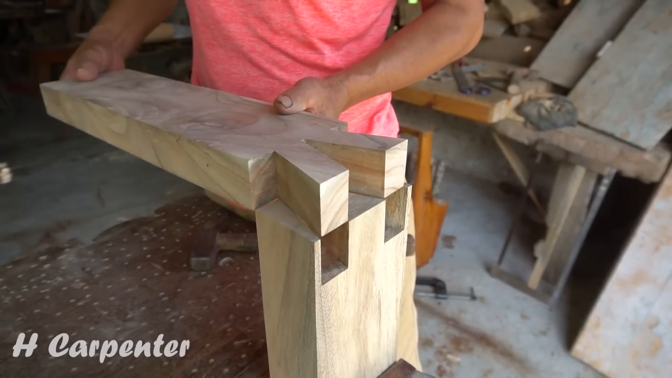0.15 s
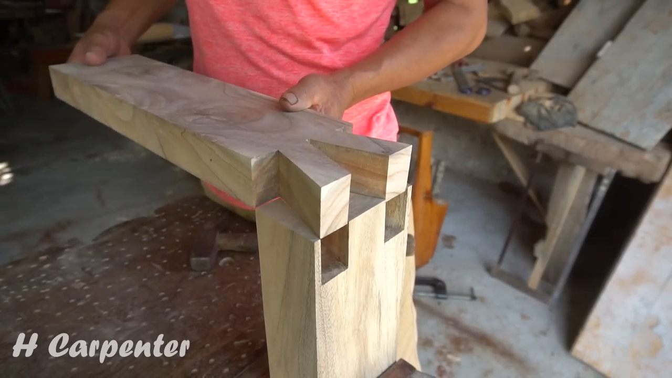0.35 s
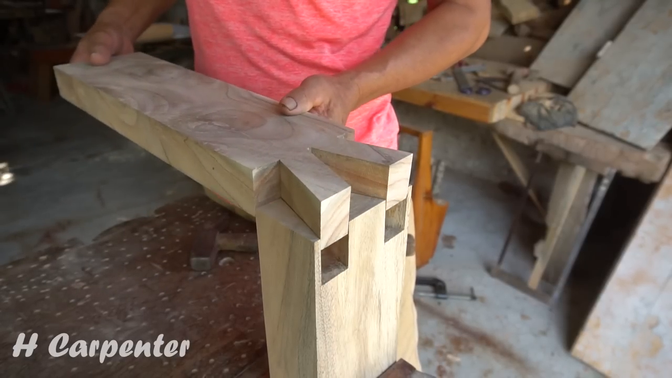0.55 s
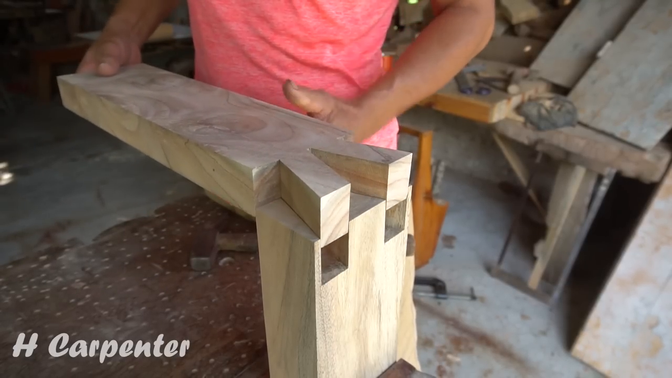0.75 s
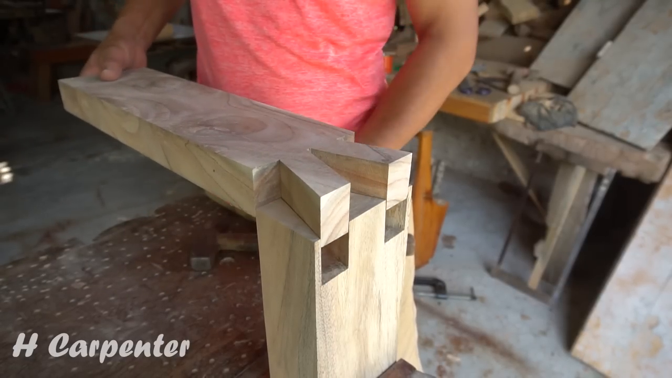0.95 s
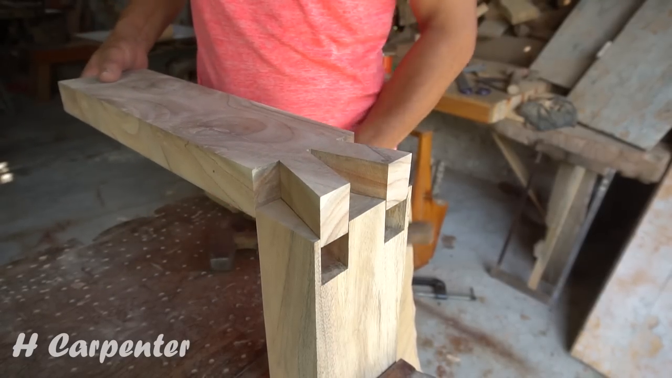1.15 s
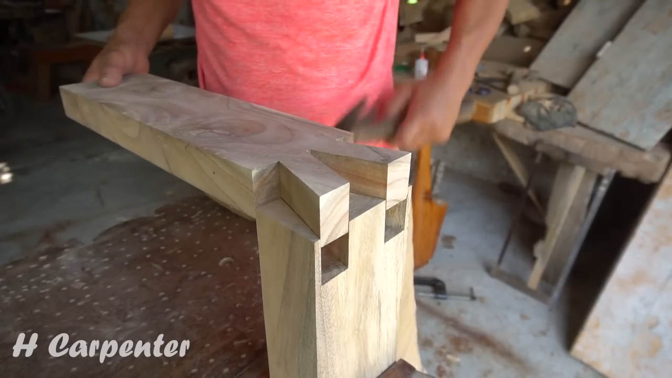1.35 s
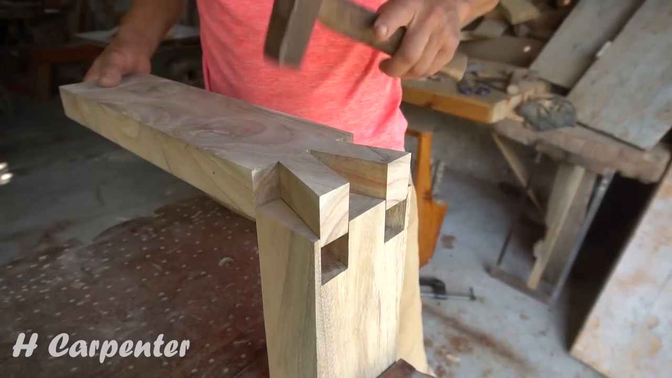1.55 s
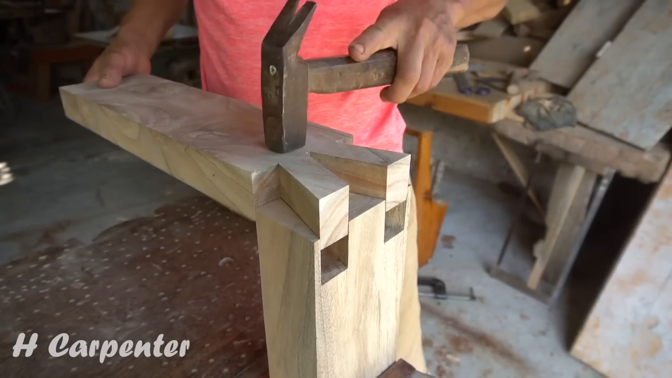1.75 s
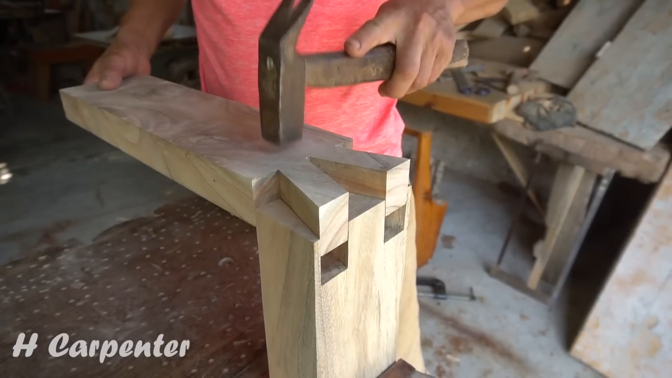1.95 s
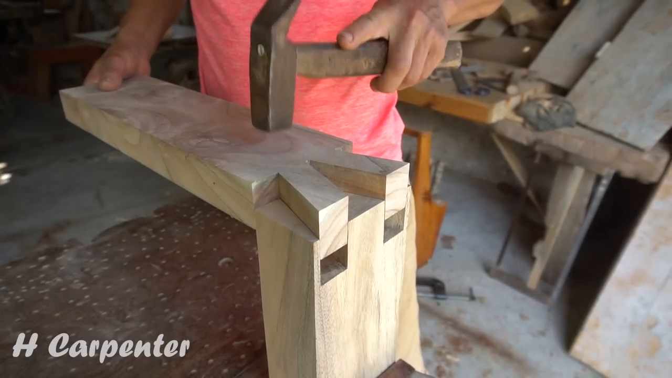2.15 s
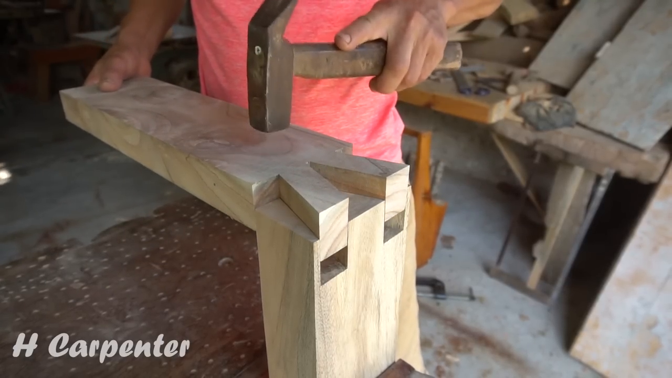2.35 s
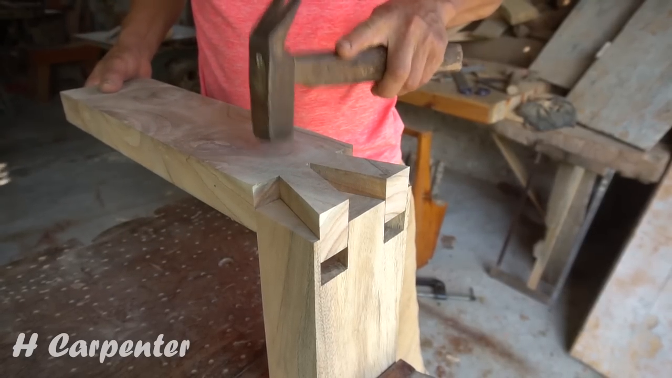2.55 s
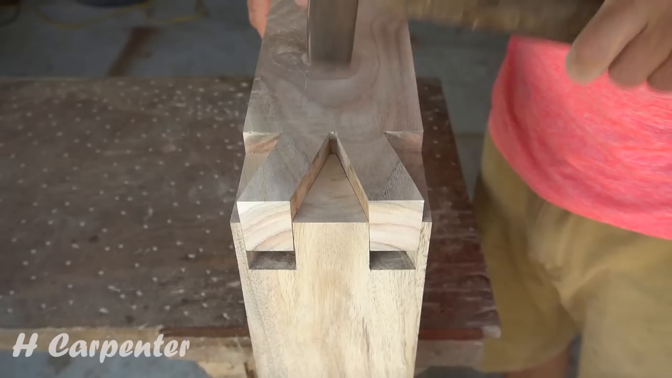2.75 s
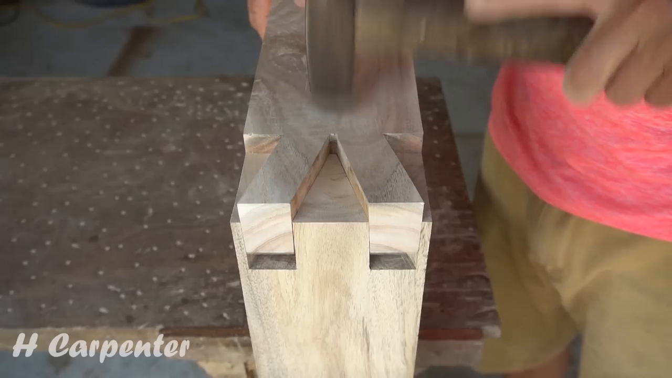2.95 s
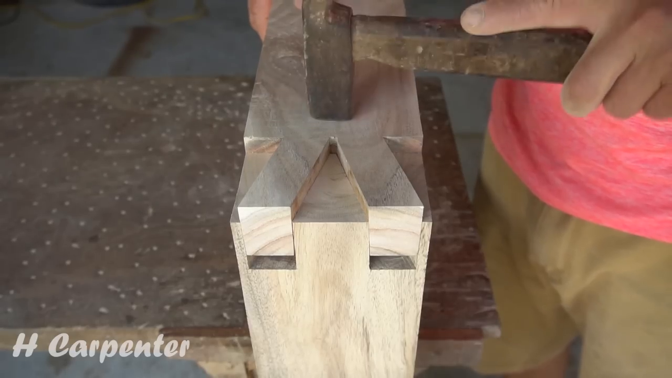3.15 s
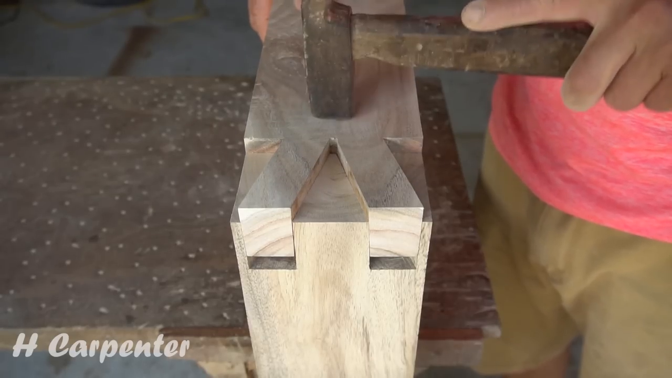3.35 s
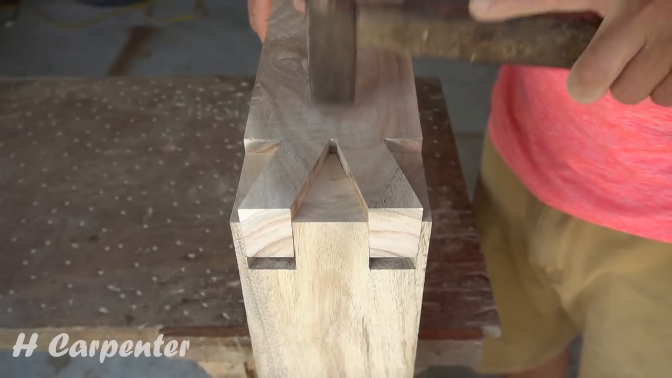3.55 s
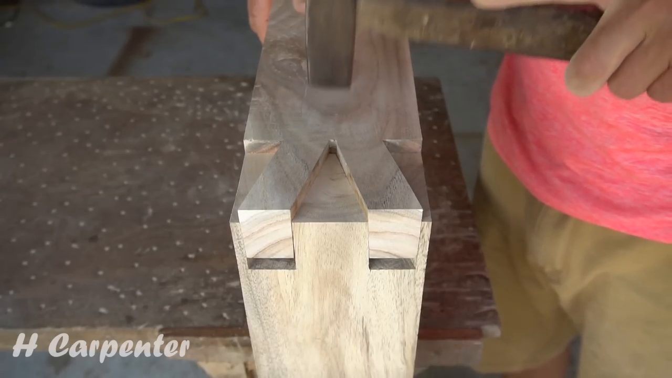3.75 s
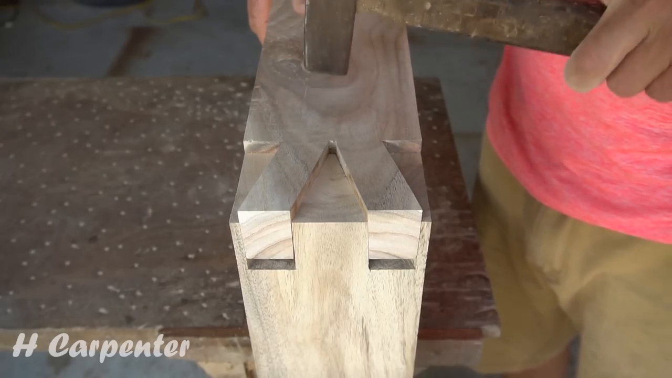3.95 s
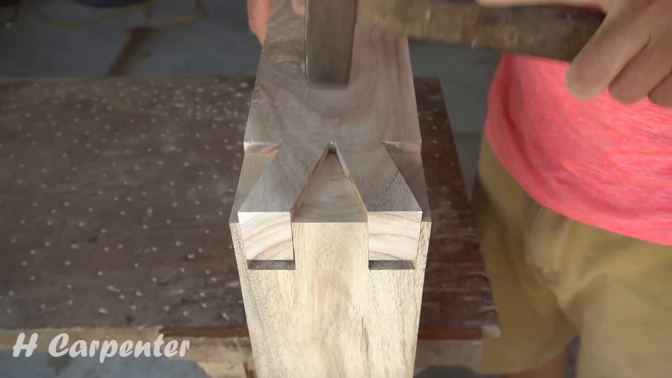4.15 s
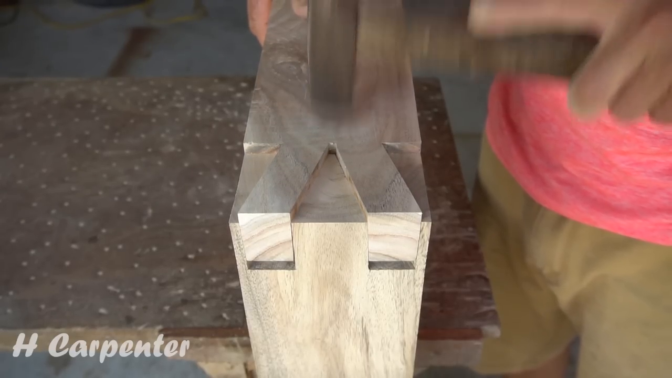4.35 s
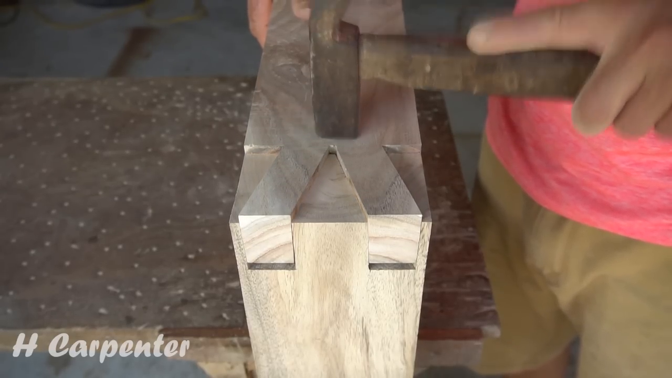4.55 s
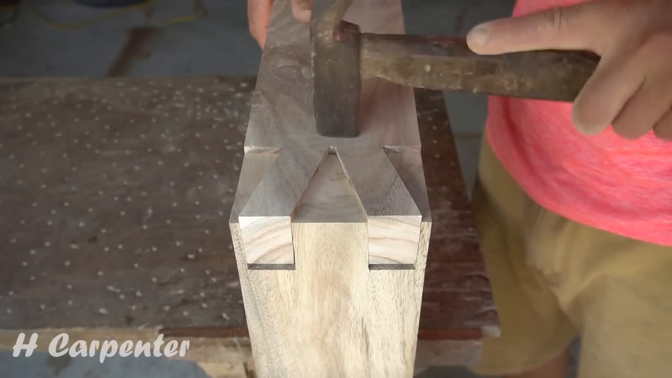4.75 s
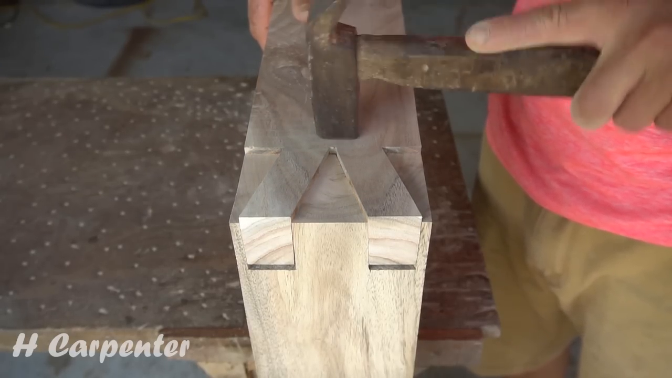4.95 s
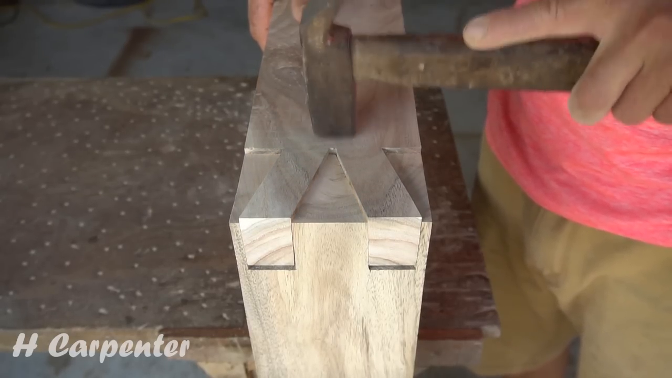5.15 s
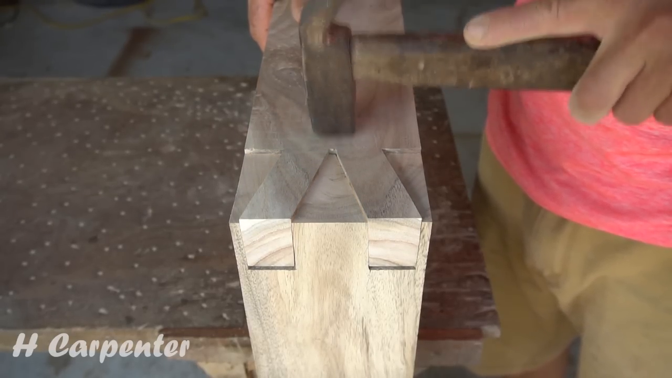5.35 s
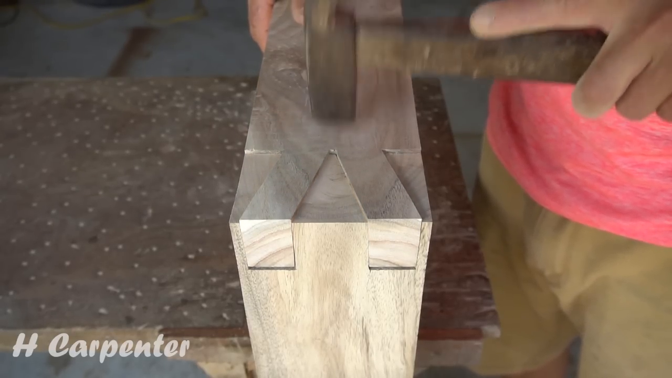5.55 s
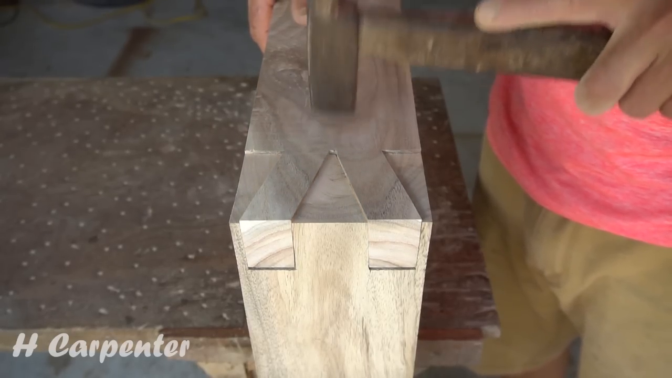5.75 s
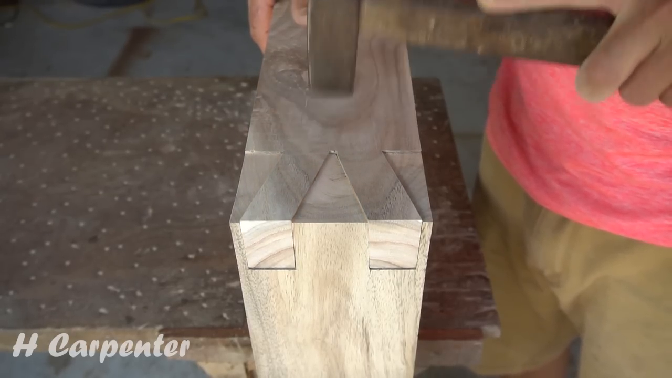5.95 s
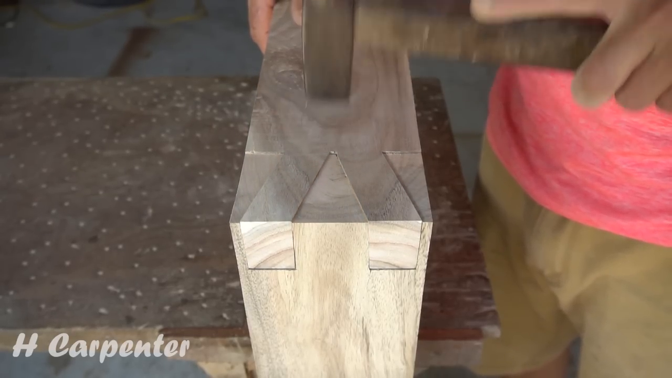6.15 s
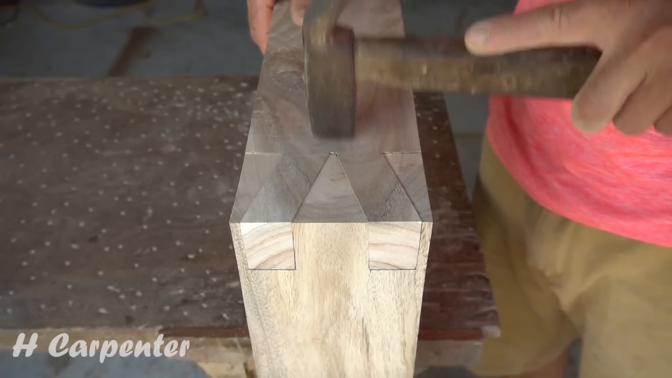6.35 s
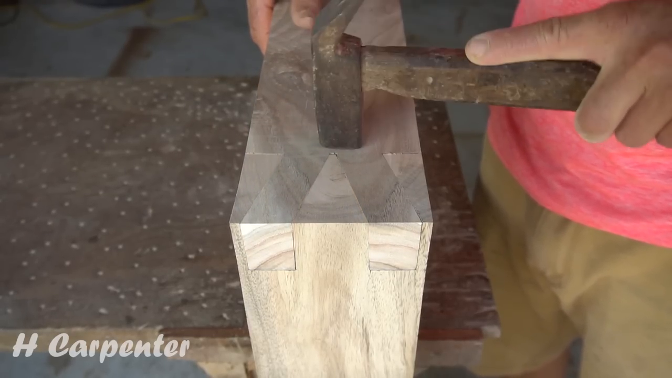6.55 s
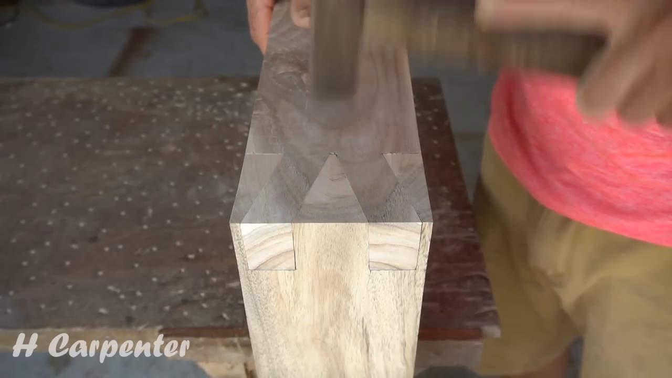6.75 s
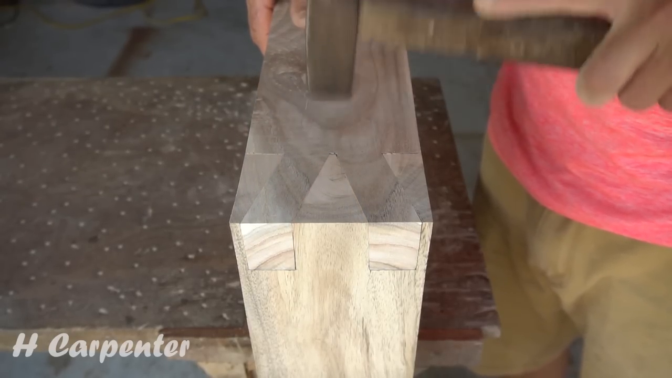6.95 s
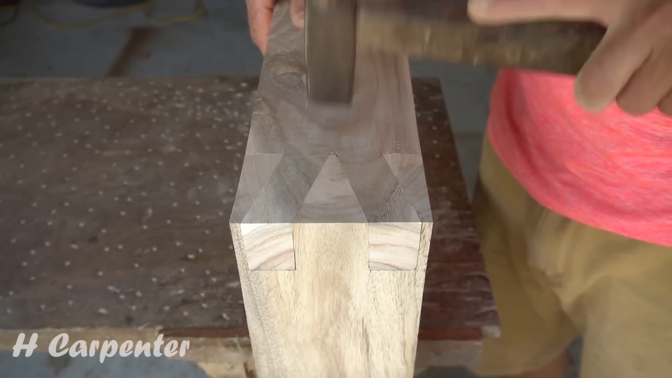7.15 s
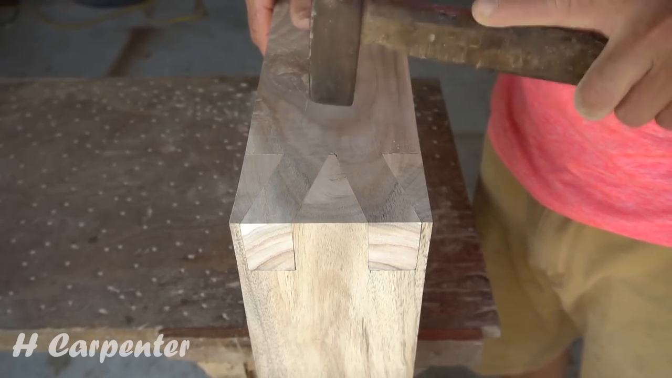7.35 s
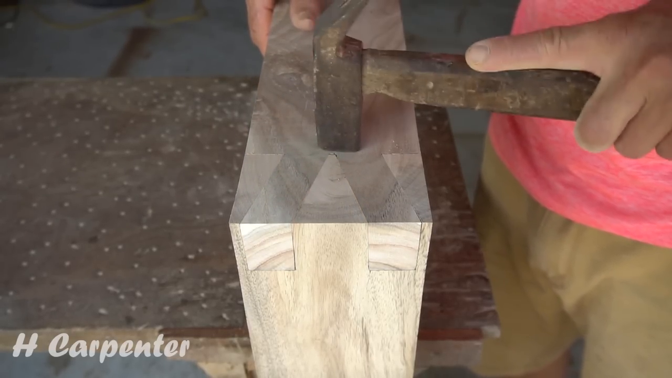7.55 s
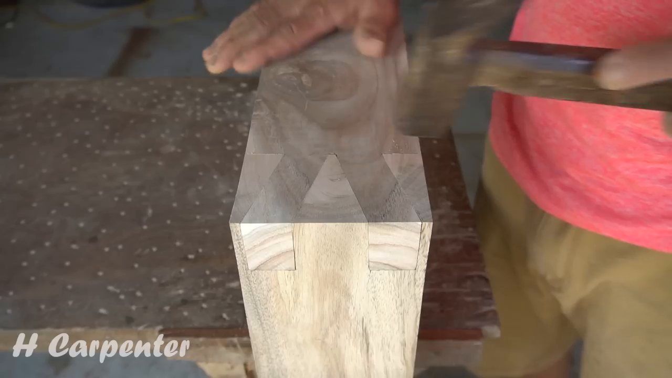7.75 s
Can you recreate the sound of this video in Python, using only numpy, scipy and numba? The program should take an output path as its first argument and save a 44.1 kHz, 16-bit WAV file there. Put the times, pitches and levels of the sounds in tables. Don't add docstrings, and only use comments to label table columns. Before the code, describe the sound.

A beam is slid and bumped onto its post, then quick hard hammer blows crack and ring the wood, with shed echoes, low thuds and wind rumble.

```python
import sys
import numpy as np
from scipy import signal
from scipy.fft import rfft, irfft
from scipy.io import wavfile
from scipy.ndimage import uniform_filter1d
from numba import njit

SR = 44100
rng = np.random.default_rng(int(sys.argv[2]) if len(sys.argv) > 2 else 0)


def volts_from_decibels(level):
    exponent = np.asarray(level, float) / 20
    return 10 ** exponent


def int16_out(signal):
    q = np.round(np.clip(np.atleast_2d(signal).T, -1, 1) * 32767)
    wavfile.write(sys.argv[1], SR, q.astype(np.int16))


N = 343980
TIME = np.arange(N) / SR

# t/s, strength level/dB, depth level/dB, brightness level/dB
SIDE_BLOWS = [
    (1.8154, -16.5, 6, -5),
    (1.9371, -5.5, -18, -0.5),
    (2.1044, -8.5, 8, -20.5),
    (2.2847, -4.5, -8, 8),
    (2.466, -3, -5, 8.5),
    (2.6394, -1.5, 3, 8),
]
# t/s, strength level/dB, depth level/dB, brightness level/dB
END_BLOWS = [(2.8495, 2, -5, 9.5), (3.022, 2, 0, 12), (3.1934, 0, 6.5, 8.5), (3.3695, -1, -6, 12),
             (3.5389, 1.5, -5, 9.5), (3.7127, 2.5, -6, 12), (3.889, 1.5, -7, 4.5), (4.0689, 3.5, 2.5, 13.5),
             (4.2454, 2.5, 0, 5.5), (4.4303, 5, -0.5, 12), (4.6131, 5, 3, 9.5), (4.7992, 3.5, 9, 9),
             (4.9808, 4.5, 4.5, 2.5), (5.1638, 4, 2.5, 9), (5.3509, 3.5, 4.5, 9.5), (5.537, 4, 3, 9),
             (5.7186, 1, 3.5, 7), (5.9053, 5.5, 3, 10), (6.0961, 5.5, 2, 8), (6.3098, 6.5, 4.5, 10.5),
             (6.564, 12, -3, -1.5), (6.8383, 12.5, -11, 7), (7.104, 11.5, -8.5, 9.5),
             (7.2951, 10.5, -7.5, 9.5), (7.4516, 6, -5, 5.5), (7.5959, 7, -6, 2)]
BALANCE_HZ = [700, 1600, 3100, 4200]
# f/Hz, level/dB with the joint open, level/dB with it seated, t60/s
TIMBER = [(520, -32, -77, 0.005), (712, -29, -5, 0.034), (907, -1.5, -0.5, 0.012), (1180, -15, 1, 0.0085),
          (1340, 1.5, -15.5, 0.018), (1503, -4.5, -27.5, 0.045), (1796, -6.5, -3.5, 0.01),
          (2020, -2.5, 7.5, 0.0096), (2220, 5.5, -6.5, 0.016), (2435, 8, -9.5, 0.012),
          (3085, 9, 0.5, 0.0063), (3517, 10.5, -10, 0.005), (4090, -7.5, -31.5, 0.021),
          (4690, -82, -28, 0.0039)]
# f/Hz, level/dB, rise/s, t60/s
BENCH = [(115.7, -5, .018, .16), (161, -12, 0.013, 0.16), (208.5, -16.5, 0.012, 0.17),
         (280, -9, 0.011, 0.1063)]
# t/s, level/dB, swing f/Hz, t60/s
JOLTS = [
    (6.843, 5, 19, 0.27),
    (7.106, 6, 28, 0.2),
]
# t/s, peak level/dB, f/Hz, t60/s, brightness level/dB
KNOCKS = [(0.26, -28.5, 98, 0.095, -49), (.49, -28.5, 630, 0.049, -27), (0.586, -42, 3500, 0.16, -20),
          (1.4, -43, 2680, 0.3, -30), (.962, -32, 710, 0.034, -6), (1.058, -10, 578, 0.019, -42),
          (1.059, -16.5, 344, 0.087, -40), (1.059, -23, 83, 0.19, -50), (1.121, -21.5, 420, 0.035, -40),
          (1.25, -24.5, 84, 0.14, -50), (1.639, -28.5, 70, 0.087, -50), (1.678, -26, 1430, 0.026, 2)]
# loudest t/s, swell/(dB/s), fade/(dB/s), rub level/dB, rasp level/dB
SLIDES = [
    (.08, 244, 137, -48, -45),
    (.49, 445, 700, -32.5, -46),
    (.6, 300, 400, -52, -64),
    (1.17, 117, 69, -38.5, -66.5),
    (1.262, 200, 450, -22.5, -45),
    (1.43, 300, 250, -43.5, -71),
    (6.75, 400, 202, -70, -55),
]
# f/Hz, width f/Hz, level/dB
RUB = [(380, 106, 9.5), (550, 155, 7), (970, 220, -5.5), (1350, 200, -26), (1740, 57, -11), (2117, 29, -3)]
RASP = [(3170, 210, 3.5), (4500, 450, 2.5), (5570, 230, 1.5), (7200, 520, 1.5), (8850, 310, 1)]
# f/Hz, level/dB, t60/s
SHED = [(216, 7, 0.16), (380, -32.5, 0.21), (640, -19.5, 0.039), (960, 3, 0.12), (2160, -10, 0.16),
        (4650, -3.5, 0.14), (7500, -12, 0.13), (13700, -28, 0.16)]
# delay t/s, level/dB
ECHOES = [(.021, -19), (.029, -18), (.034, -20), (.043, -22)]
# t/s, level/dB
WIND = [(0, -53), (.5, -36.5), (.75, -46.5), (1.1, -34.5), (1.65, -39), (2.15, -41), (2.55, -29),
        (2.69, -31), (2.74, -16.5), (3.03, -8), (3.18, -17.5), (3.42, -12.5), (3.55, -19.5), (4.1, -28),
        (4.6, -45), (5.5, -57), (6.15, -34.5), (7.8, -37.5)]
# start t/s, length/s, f/Hz, level/dB
INSECT = [
    (6.947, 0.063, 9200, -65),
    (7.01, .08, 9400, -61),
]
# f/Hz, level/dB per Hz
AIR = [
    [(47, -9), (90, -2), (300, -14), (440, -24.5), (650, -13), (860, -21.5), (1150, -18.5), (16000, -47)],
    [(45, 17), (100, 10), (215, 6.5), (280, -7.5), (470, -12.5), (1500, -15.5), (5000, -33), (16000, -59.5)],
]
AIR_DB = [-41.5, -34]
# f/Hz, level/dB
MOTOR = [
    [(108, -75.5), (163, -75), (215.3, -48.5), (274, -50.5), (404, -65), (544, -64), (651.4, -53.5),
     (1023, -57.5), (1141, -62), (1297, -58), (2126, -63)],
    [(108, -76), (215, -51), (510, -65)],
]

STANCES = 4
GAP_HZ, GAP_DB, GAP_T60_S, GAP_LOSS_DB = 1079, 10, 0.012, 4
HOME_HZ, HOME_DB, HOME_T60_S, HOME_GAIN_DB = 2255, 0, .018, 4
STEEL_HZ, STEEL_DB, STEEL_T60_S = 8120, -9.5, 0.003
GUST_DB, GUST_PER_S = 1.8, 12
MOVE_S, CATCH_UP_S = 2.72, .04
HISS_DB, OVERLOAD, RELEASE_S = -63, 2.4, .045


def colour(x, points):
    hz, db = np.transpose(points)
    bins = np.maximum(np.fft.rfftfreq(len(x), 1 / SR), 1)
    y = irfft(rfft(x) * volts_from_decibels(np.interp(np.log(bins), np.log(hz), db)), len(x))
    return y / np.std(y)


def band(x, hz, width_hz):
    return signal.lfilter(*signal.iirpeak(hz, hz / width_hz, fs=SR), x)


def filtered(x, order, hz, kind="low"):
    return signal.sosfilt(signal.butter(order, hz, kind, fs=SR, output="sos"), x)


def walk(rate):
    k = int(SR / rate)
    held = np.repeat(rng.standard_normal(N // k + 1), k)
    return 1.3 * uniform_filter1d(uniform_filter1d(held, k), k)[:N]


def fade(t, t60):
    return volts_from_decibels(-60 * t / np.maximum(t60, 1e-3))


def ring(t, hz, db, t60):
    return volts_from_decibels(db) * np.sin(2 * np.pi * hz * t) * fade(t, t60)


def add(out, s, x):
    i = int(s * SR)
    out[i:i + len(x)] += x[:len(out) - i]


def hammer():
    strikes = SIDE_BLOWS + END_BLOWS
    count = len(strikes)
    blows, thud = np.zeros((STANCES, N)), np.zeros(N)
    t, long = TIME[:SR // 8], TIME[:SR // 3]
    hz, open_db, seated_db, t60 = np.transpose(TIMBER)[:, :, None]
    chance = rng.standard_normal((count, 2, len(hz), 1))
    crack = .15 * rng.standard_normal((count, len(t)))
    crack[:, 0] = -1.38
    gap = ring(t, GAP_HZ, GAP_DB, GAP_T60_S)
    home = ring(t, HOME_HZ, HOME_DB, HOME_T60_S)
    steel = -volts_from_decibels(STEEL_DB) * np.cos(2 * np.pi * STEEL_HZ * t) * fade(t, STEEL_T60_S)
    bench = np.array([ring(long, f, db, d) * (1 - np.exp(-long / rise)) ** 2 for f, db, rise, d in BENCH])
    sway = volts_from_decibels(2.5 * rng.standard_normal((count, len(BENCH))))
    for k, (s, db, deep_db, bright_db) in enumerate(strikes):
        seat = k / (count - 1)
        tilt_db = np.interp(np.log(hz), np.log(BALANCE_HZ), [deep_db, 0, 0, bright_db])
        gain_db = open_db + seat * (seated_db - open_db) + tilt_db
        pitch = hz * (1 + .018 * chance[k, 1])
        timber = ring(t, pitch, gain_db + 1.5 * chance[k, 0], t60).sum(axis=0)
        snap = volts_from_decibels(-1 + bright_db) * crack[k] * fade(t, 0.004)
        joint = volts_from_decibels(-GAP_LOSS_DB * k) * gap + volts_from_decibels(HOME_GAIN_DB * (k - 2 - count)) * home
        head = volts_from_decibels(bright_db) * steel
        add(blows[k % STANCES], s, volts_from_decibels(db + 6) * (timber + snap + joint + head))
        add(thud, s, volts_from_decibels(db) * sway[k] @ bench)
    for s, db, swing_hz, d in JOLTS:
        add(thud, s, ring(long, swing_hz, db, d))
    return filtered(blows, 3, 540, "high"), thud


def knocks():
    out, t = np.zeros(N), TIME[:SR // 8]
    for s, db, hz, t60, bright_db in KNOCKS:
        tap = rng.standard_normal(len(t)) * fade(t, t60)
        body = 0
        for ratio, mode_db in [(1.0, 13), (1.6, -4.5), (2.3, 0), (3.7, -4.5)]:
            f = ratio * hz
            body = body + volts_from_decibels(mode_db) * band(band(band(tap, f, 0.39 * f), f, 0.4 * f), f, 0.39 * f)
        click = volts_from_decibels(bright_db) * band(tap, 2500, 2700)
        add(out, s + 0.0024, volts_from_decibels(db) * (body / np.abs(body).max() + click))
    return out


def slides():
    out = np.zeros(N)
    grains = rng.standard_normal(N) * volts_from_decibels(3.0 * rng.exponential(size=N)) * volts_from_decibels(1.5 * walk(80))
    grains = band(grains, 2500, 7200)
    layers = []
    for peaks in (RUB, RASP):
        layer = sum(volts_from_decibels(db) * band(band(grains, f, 2 * w), f, 2 * w) for f, w, db in peaks)
        layers.append(layer / np.std(layer))
    for s, swell, drop, *levels in SLIDES:
        push = volts_from_decibels(-np.maximum(swell * (s - TIME), drop * (TIME - s)))
        for layer, db in zip(layers, levels):
            out += volts_from_decibels(db) * layer * push
    return out


def shed():
    t = TIME[:SR // 2]
    hz, db, t60 = np.transpose(SHED)
    tail = 0
    for f in 200 * 2 ** np.arange(0, 6.6, .5):
        band_db, band_t60 = [np.interp(np.log(f), np.log(hz), column) for column in (db, t60)]
        noise = band(rng.standard_normal(len(t)), f, f / 2.12)
        tail = tail + volts_from_decibels(band_db) * noise * fade(np.maximum(t - .035, 0), band_t60)
    grain = volts_from_decibels(2.2 * walk(500)[:len(t)])
    response = volts_from_decibels(-40.5) * tail * grain * (1 - np.exp(-t / 0.00077))
    for delay, echo_db in ECHOES:
        smear = band(rng.standard_normal(SR // 100), 2500, 5000) * fade(t[:SR // 100], .005)
        add(response, delay, volts_from_decibels(echo_db - 13) * smear)
    return response


def heard(blows, hands):
    total = blows.sum(axis=0) + volts_from_decibels(-8.5) * hands
    near = filtered(total, 1, 900, "high")
    places = [near + signal.fftconvolve(total, shed())[:N] + air(place) for place in range(2)]
    for track in blows:
        places = places + volts_from_decibels(-1.5) * signal.fftconvolve(track, shed())[:N]
    return places


def wind():
    s, db = np.transpose(WIND)
    deep_points = [(4, -81), (12, 6.5), (25, 0.5), (40, -6), (60, -21), (200, -100)]
    deep = colour(rng.standard_normal(N), deep_points)
    deep /= np.sqrt(uniform_filter1d(deep ** 2, SR // 8))
    upper_points = [(25, -71.0), (55, 4.5), (90, -12), (160, -18.5), (500, -58)]
    upper = colour(rng.standard_normal(N), upper_points)
    gust = volts_from_decibels(np.interp(TIME, s, db) + GUST_DB * walk(GUST_PER_S))
    return gust * (deep + upper * volts_from_decibels(-12.5 + 2.9 * walk(32)))


def insect():
    out = np.zeros(N)
    for s, length, hz, db in INSECT:
        size = int(length * SR)
        whistle = band(rng.standard_normal(size), hz, 90)
        add(out, s, volts_from_decibels(db) * np.hanning(size) * whistle / np.std(whistle))
    return out


def air(place):
    wash = colour(rng.standard_normal(N), AIR[place]) * volts_from_decibels(AIR_DB[place] + 1.5 * walk(3))
    for hz, db in MOTOR[place]:
        phase = 2 * np.pi * np.cumsum(hz * (1 + .0025 * walk(10))) / SR
        wash += np.sqrt(2) * volts_from_decibels(db + 1.2 * walk(7.0)) * np.sin(phase)
    return wash


def scene():
    blows, thud = hammer()
    hands = knocks() + slides()
    first, second = heard(blows, hands)
    before_blow = TIME < END_BLOWS[0][0] - .004
    second = np.where(before_blow, np.roll(second, int(CATCH_UP_S * SR)), second)
    later = np.clip((TIME - MOVE_S) / .012, 0, 1)
    places = first + later * (second - first)
    return (places + 0.7 * hands + thud + wind() + insect())[None]


@njit
def duck(x, key, top, slope, attack, release):
    y, level = np.empty(len(x)), 0.
    for i in range(len(x)):
        size = abs(key[i])
        level += (size - level) * (attack if size > level else release)
        y[i] = x[i] * min(1., top / (level + 1e-9)) ** slope
    return y


def band_limit(x):
    return signal.sosfilt(signal.butter(12, 16450, fs=SR, output="sos"), x)


def record(dry):
    x = filtered(dry[0], 2, 11000)
    low = filtered(x, 2, 60)
    hiss = volts_from_decibels(HISS_DB) * rng.standard_normal(N)
    x = low + np.clip(x - low + hiss, -OVERLOAD, OVERLOAD)
    key = filtered(x, 2, 150, "high")
    x = duck(x, key, volts_from_decibels(-10.5), 0.9, 1 / (0.0021 * SR), 1 / (RELEASE_S * SR))
    top_cut = signal.butter(16, 16250, fs=SR, output="sos")
    x = signal.sosfiltfilt(top_cut, np.clip(x, -.96, .96))
    return band_limit(x[None])


dry = scene()
out = record(dry)
int16_out(out)
```